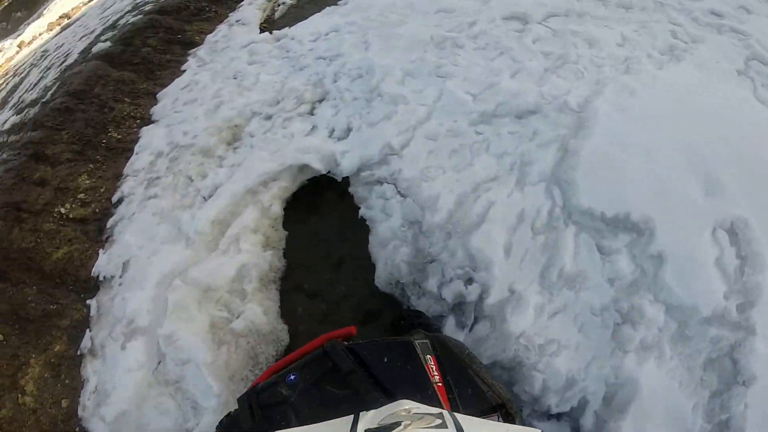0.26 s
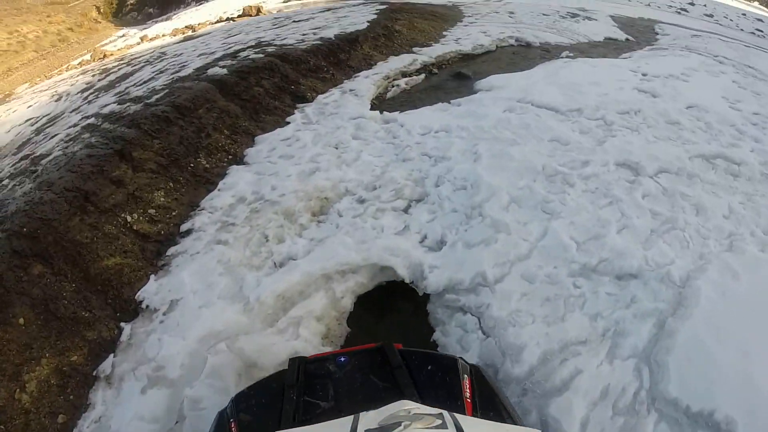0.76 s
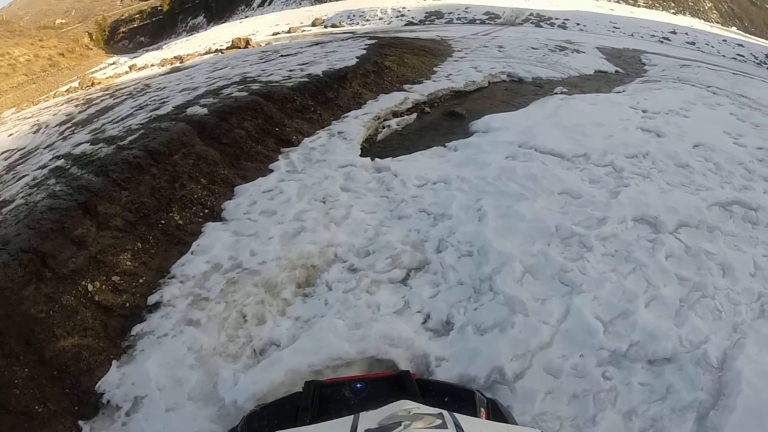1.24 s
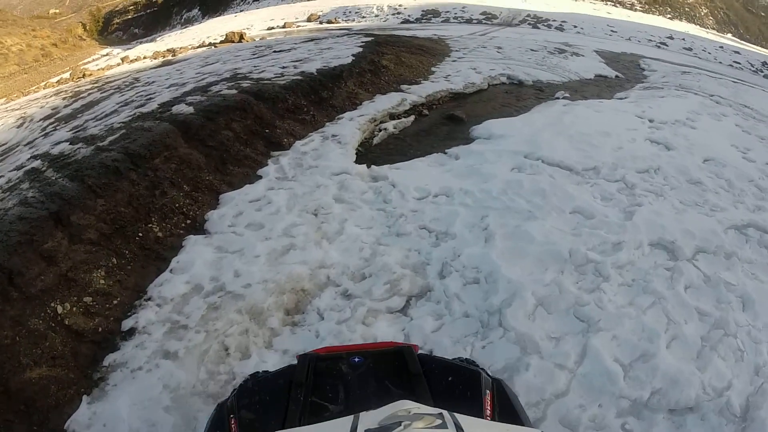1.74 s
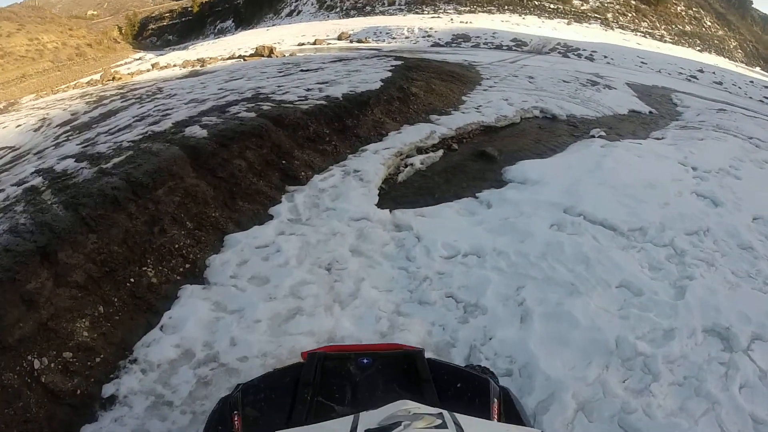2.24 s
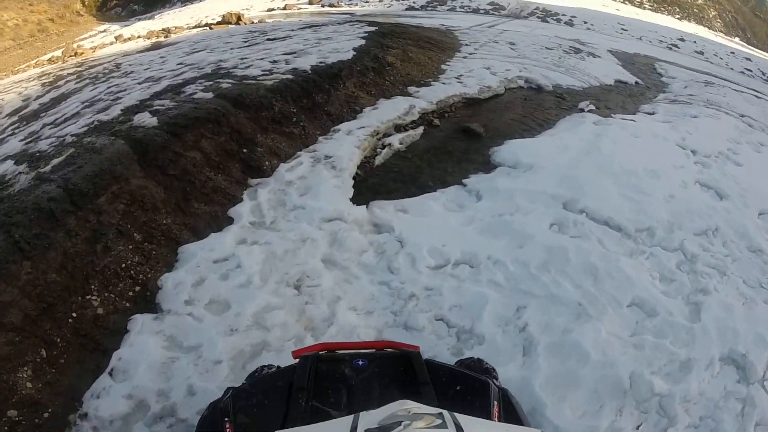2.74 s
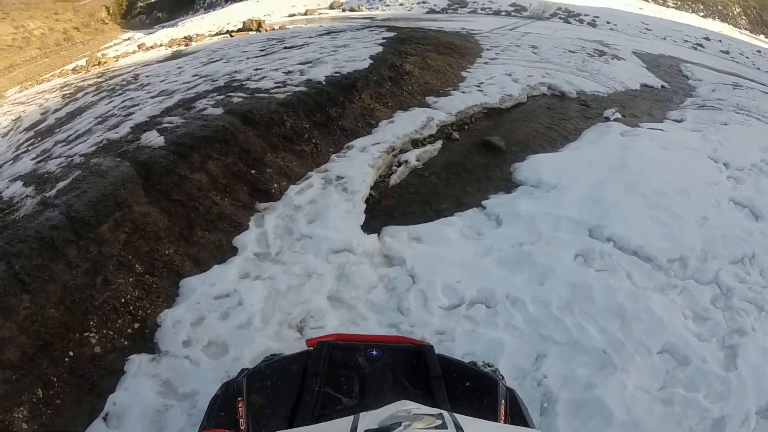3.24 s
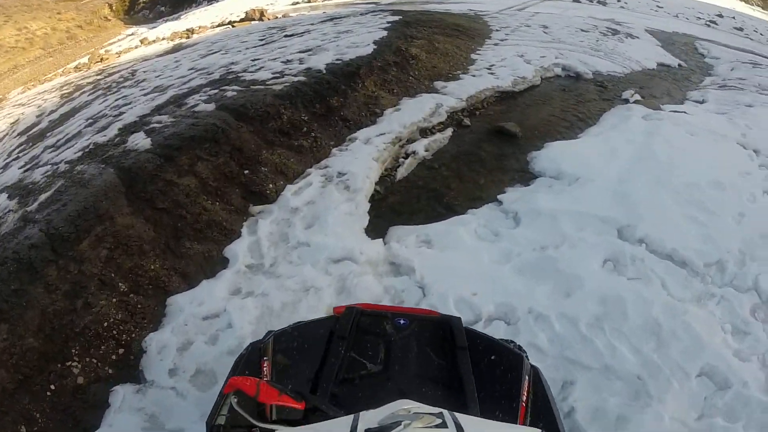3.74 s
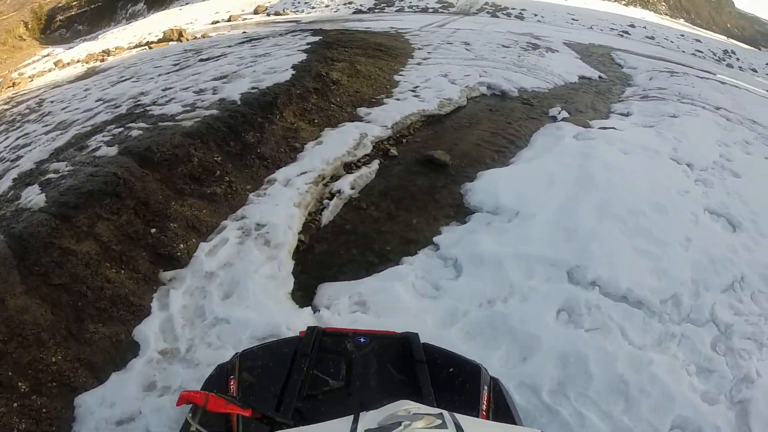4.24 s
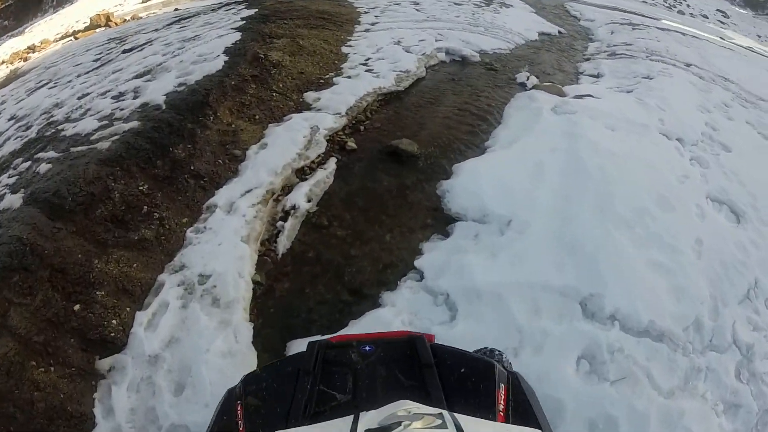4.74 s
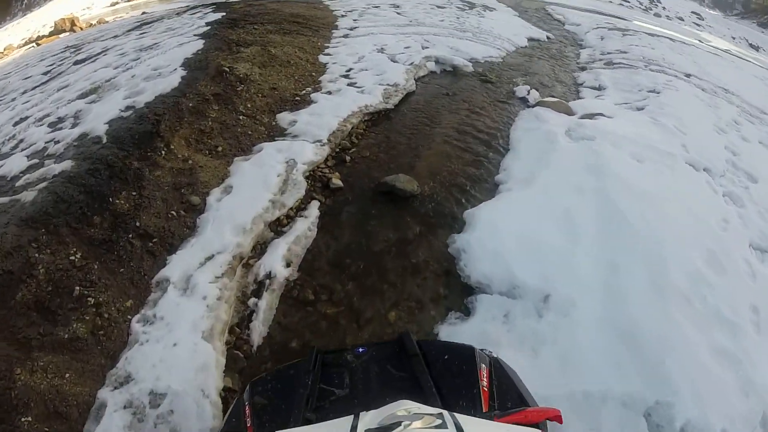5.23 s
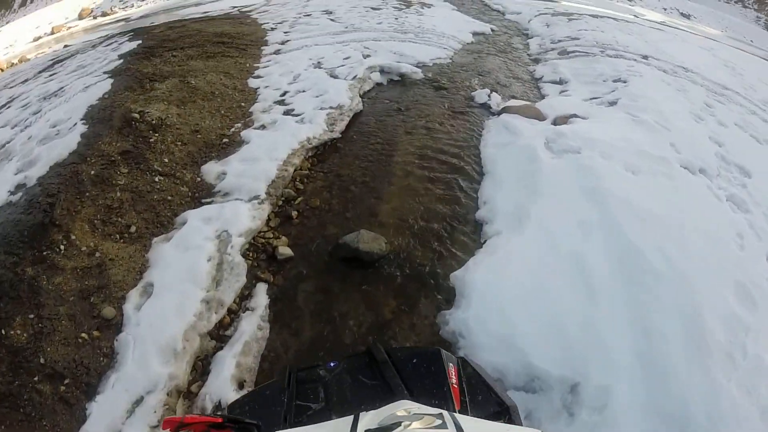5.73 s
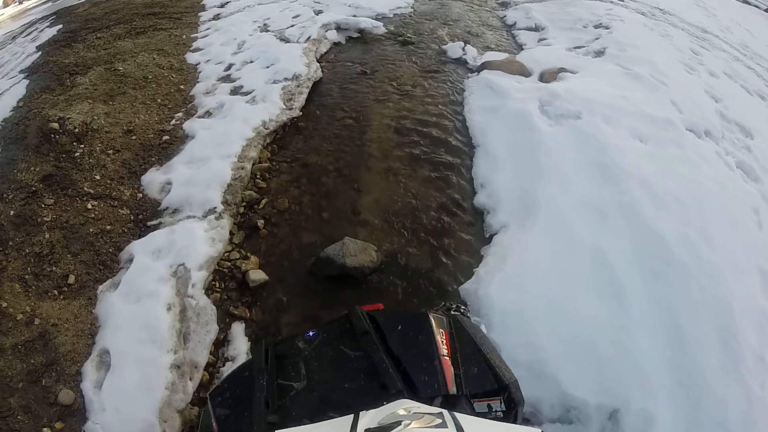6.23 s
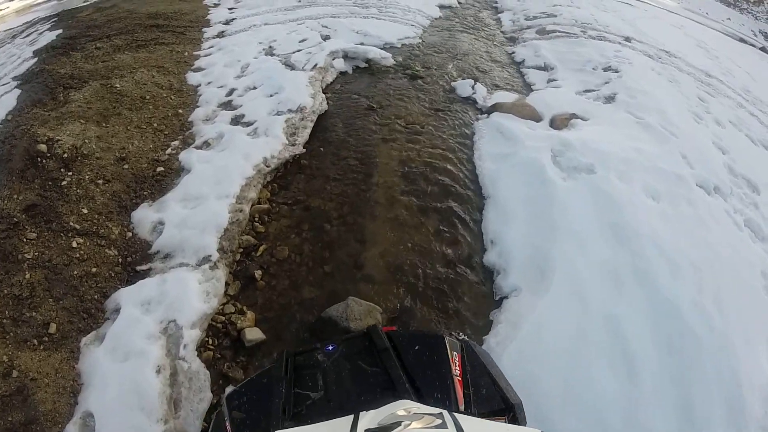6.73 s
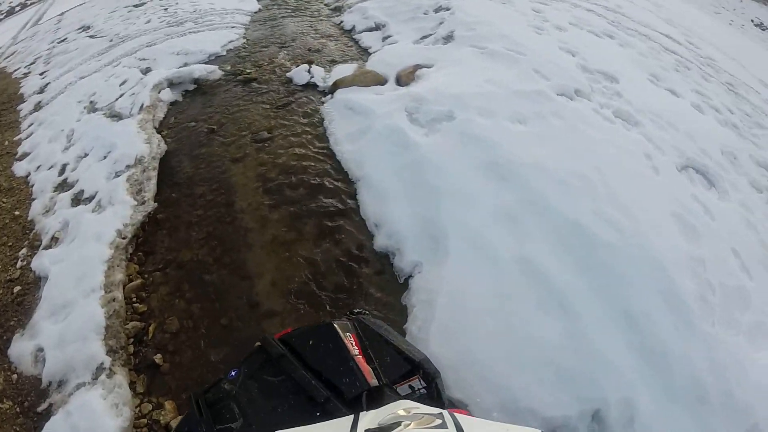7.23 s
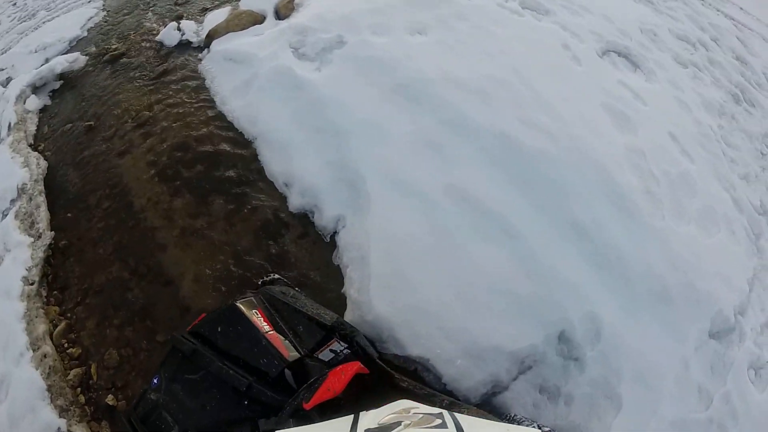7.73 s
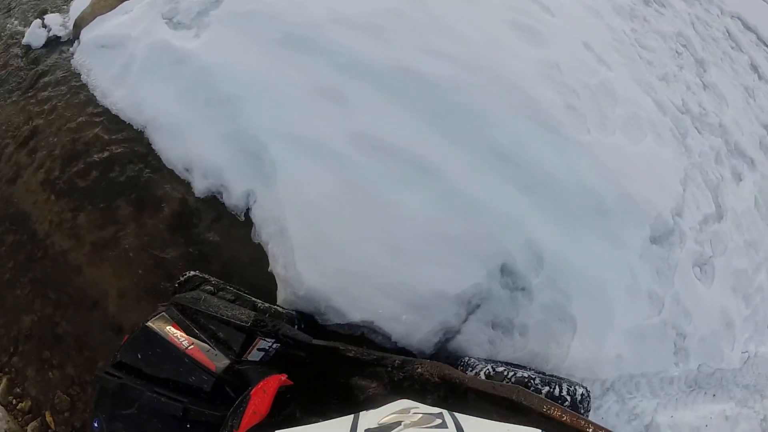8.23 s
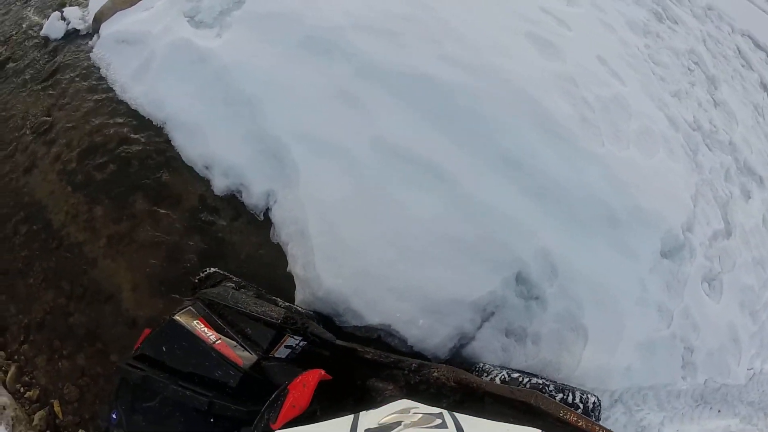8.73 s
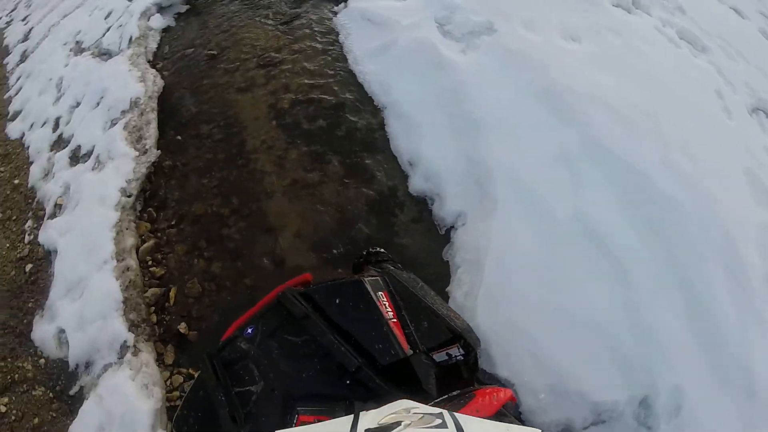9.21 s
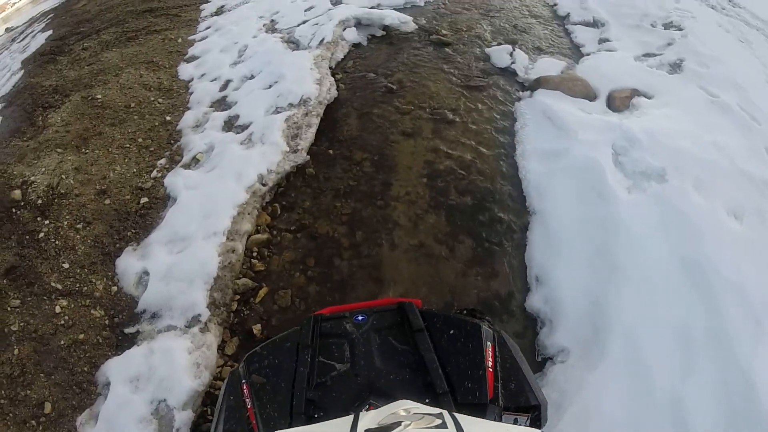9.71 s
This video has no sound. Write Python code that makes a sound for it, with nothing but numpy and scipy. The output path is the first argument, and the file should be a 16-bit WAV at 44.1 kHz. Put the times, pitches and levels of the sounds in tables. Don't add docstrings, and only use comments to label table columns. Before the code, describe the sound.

A quad bike's uneven twin-cylinder engine is heard close below a helmet-mounted microphone in a snowy creek bed, dry and without echo. It begins in a throaty growl at medium revs, lifts near 0.5 s, sags by 1.3 s and surges again at 1.8 s. After easing, it climbs from 2.6 s to its highest pitch near 3.4 s and stays loud, barking and booming until 4.7 s, with a thin metal panel singing around 1.6 kHz. Revs tumble by 5.5 s amid dull stone knocks. From 6 to 8 s it idles slowly, paired thuds over clattering valve gear, missing one beat near 8 s. It pulls away with deep intake gulps, rising to 9.2 s, then eases with loose rattles. Sharp plastic ticks, notably at 1.8, 2.5, 3.6 and 6.5 s, punctuate faint snow crunch and deep microphone shudder.

```python
import sys
import numpy as np
from scipy import signal
from scipy.fft import rfft, irfft
from scipy.io import wavfile
from scipy.ndimage import uniform_filter1d

SR = 44100
rng = np.random.default_rng(int(sys.argv[2]) if len(sys.argv) > 2 else 0)


def wrap_up_sound(samples):
    columns = np.atleast_2d(samples).T
    tamed = np.clip(columns, -1, 1)
    steps = np.round(tamed * 32767).astype(np.int16)
    wavfile.write(sys.argv[1], SR, steps)


def gain_from_db(level_db):
    decades = np.asarray(level_db, float) / 20
    return 10 ** decades


N = 439677
T = np.arange(N) / SR

# time_s, cycle_rate_hz
SPEED = [(0.0, 18.3), (0.36, 18.8), (0.55, 22.2), (1.27, 15.2), (1.77, 27.8), (2.17, 20.8), (2.6, 19.8),
         (2.9, 25.3), (3.38, 31.0), (3.8, 26.3), (4.15, 30.0), (4.62, 29.7), (5.5, 13.6), (6.05, 9.96),
         (8.0, 9.85), (8.62, 12.4), (9.2, 17.7), (9.97, 13.2)]
# centre_s, half_width_s, change_hz
SPEED_CHANGES = [(1.8, .12, -.5), (3.6, .12, -.5), (4.85, .2, -.7), (5.2, .1, -1), (5.4, .08, .5), (5.8, .2, -.6),
                 (6.85, .2, -.09), (7.2, .15, .09), (7.7, .15, -.08), (8.1, .15, .3), (8.45, .18, -.17)]
# time_s, pipe_level_db, throttle_0_to_1
EFFORT = [(0.0, -39, 1), (0.28, -41.5, 0.33), (0.46, -41.5, 0.95), (1.2, -41.5, 0.73), (1.53, -38, 1),
          (1.94, -37, 0.96), (2.25, -41, 0.68), (2.58, -40, 0.95), (2.8, -35, 0.91), (3.44, -35.5, 0.93),
          (3.8, -38, 1), (4.5, -32.5, 0.87), (5.05, -37, 0.48), (5.16, -46, 0.48), (7.95, -48.5, 0.32),
          (8.35, -49, 0.35), (9.19, -42.5, 0.4), (9.97, -45.5, 0.22)]
# centre_s, half_width_s, change_db
STUMBLES = [
    (5.32, 0.053, -1),
    (5.62, 0.11, -0.5),
    (5.85, 0.056, 2),
    (7.975, 0.026, -20),
]
# pitch_hz, width_hz, level_db
INTAKE = [(154, 26, 7.5), (204, 40, 1), (95.5, 26, -6), (135, 8.9, -7.5)]
# pitch_hz, width_hz, level_db
EXHAUST = [(209, 59, 0), (147, 4.9, -28), (221, 15, -48), (90, 310, -12)]
# pitch_hz, width_hz, level_db
BARK = [(255.4, 56, 6), (303, 55, -5), (399.3, 21, -1), (556, 71, -14.5), (723, 61, -17.5)]
# pitch_hz, width_hz, level_db
BOOM = [(42.3, 28.5, 0)]
# pitch_hz, width_hz, level_db
FRAME = [(58, 18, -5), (29, 6.8, -21)]
# pitch_hz, width_hz, level_db
THRUM = [(84.4, 18, 0)]
# centre_s, half_width_s, gulp_peak_db
PULLS = [
    (.5, .3, -44),
    (1.45, 0.23, -39),
    (2.9, 0.33, -45),
    (9.5, 0.31, -42),
]
# centre_s, half_width_s, gulp_peak_db
PULL_AWAY = (8.68, .5, -33.5)
# pitch_hz, width_hz, level_db
CASE = [(1392, 380, -2.5), (1813, 264, -3), (2170, 109, 4.5), (2420, 82, 4), (2860, 306, -5),
        (3373, 140, -7)]
# pitch_hz, width_hz, level_db
CASE_TOP = [(4186, 400, 1), (4520, 640, -4), (5700, 130, -13)]
# pitch_hz, width_hz, level_db
GRUMBLE = [(430, 800, -0.5), (908, 237, -1.5), (1086, 207, -5)]
# centre_s, half_width_s, change_db
BELT = [
    (.25, 0.33, -2.5),
    (.72, 0.18, 5.5),
    (2.4, 0.38, -6),
    (6.9, 0.11, -4.5),
    (8.9, 1, 4),
    (9.8, 0.23, -1),
]
# centre_s, half_width_s, order, peak_db
SONG = [(0.22, 0.32, 13, -45), (0.23, 0.74, 12, -66), (0.42, 0.091, 12, -40.5), (0.7, 0.24, 12, -45),
        (0.97, 0.18, 13, -46.5), (1.53, 0.17, 8, -41), (1.75, 0.22, 12, -48), (1.63, 0.31, 17, -46),
        (2.27, 0.5, 5, -39.5), (2.3, 0.41, 13, -49.5), (2.39, 0.38, 12, -43), (2.45, 0.51, 21, -55),
        (3.2, 0.43, 12, -52), (3.15, 0.42, 18, -52), (3.1, 0.22, 16, -54), (3.44, 0.62, 3, -51),
        (3.6, .25, 9, -44), (3.65, 0.24, 15, -61), (4.4, 0.21, 11, -40.5), (4.4, 0.3, 19, -50.5),
        (4.4, 0.36, 12, -50), (4.4, 0.18, 21, -53), (5.0, 0.11, 8, -44), (5.3, 0.067, 11, -54),
        (7.1, 0.69, 14, -58), (7.8, 0.98, 13, -65), (8.55, 0.47, 11, -49.5), (10, 0.22, 3, -40),
        (8.69, 0.65, 3, -40), (9.6, .3, 3, -54), (9.15, 0.54, 18, -51), (9.2, 0.71, 19, -55.5),
        (9.6, 0.27, 15, -50.5), (6.6, 0.74, 3, -56.5), (9.3, 0.73, 5, -53), (1.37, 0.065, 13, -38),
        (1.37, 0.16, 22, -52), (.2, 0.5, 18, -53), (3.23, 0.21, 6, -42), (3.52, 0.23, 7, -46.5),
        (7.0, 0.64, 16, -54.5), (6.15, 0.21, 35, -56), (2.13, 0.16, 8, -42), (1.73, 0.1, 9, -38),
        (3.0, 0.077, 9, -52), (3.8, 0.13, 8, -39), (4.0, 0.1, 9, -43), (2.37, 0.24, 6, -47),
        (5.25, .12, 12, -54), (8.95, 0.25, 9, -47.5)]
# pitch_hz, width_hz, level_db
PANEL_MODES = [
    [(1580, 9.1, -8.5), (1534, 20, -8.5)],
    [(1568, 8.5, 1.5), (1606, 45, -9)],
]
# start_s, hold_s, level_db
SINGING = [(0.61, 0.35, -41.5), (1.417, 0.031, -46), (1.615, 0.054, -32.5), (1.913, 0.13, -37),
           (2.24, 0.25, -48), (2.963, 0.41, -38), (3.49, 0.017, -36), (3.644, 0.22, -40),
           (4.032, 0.15, -33.5), (4.317, 0.18, -30.5), (4.59, 0.12, -31), (4.87, 0.13, -46.5),
           (5.084, 0.027, -40)]
# time_s, upper_share_0_to_1
PANEL_TONE = [(0, 0.4), (1.75, 0), (1.95, 0.3), (2.2, 0.6), (3.05, 0.04), (3.3, 0.94), (3.95, 0.4),
              (4.4, 0.9), (5.3, 0.3)]
# start_s, peak_db, pitch_hz, treble_minus_peak_db, knock_minus_peak_db
TICKS = [(1.8298, -21.5, 2180, -15, -23), (1.915, -26, 2170, -30, -24), (2.447, -38, 2340, -21, -2),
         (2.5175, -20.5, 2300, -7, -13), (3.558, -23, 2200, -8.5, -19), (5.6371, -39.5, 2270, -17, 2),
         (5.9087, -53, 2130, -2, 2), (6.2175, -41.5, 2280, 11.5, -20), (6.5164, -22, 2140, -13.5, -19),
         (6.9085, -59, 2520, -3, -13), (7.3416, -40, 2170, -3, -14), (7.645, -31, 2130, -25, -15),
         (7.9074, -25, 2170, -19, -18), (9.2199, -48, 2420, 9, -12), (9.3126, -25, 2170, -9.5, -18),
         (9.612, -37, 1800, -13, -13), (9.903, -32, 2180, -23, -8)]
# start_s, length_s, level_db, treble_minus_level_db
CHATTER = [(0.334, .004, -50, 3), (0.48, 0.0038, -45, 0.5), (.512, .012, -47, -3), (0.548, 0.0052, -49, 2),
           (6.219, .012, -45, -3.5), (6.244, .004, -48, -3), (6.39, .004, -52, -2), (9.612, .006, -44, -10),
           (9.797, 0.0077, -41.5, -8.5), (9.8164, .003, -56, 2), (9.845, .004, -48, -11),
           (9.887, .009, -44.5, -7.5), (9.909, .016, -48, -10)]
# start_s, peak_db, pitch_hz
STONES = [(5.267, -43, 374), (5.325, -33.5, 306), (5.3, -43, 544), (5.438, -40, 460), (5.531, -40, 485),
          (5.636, -34.5, 640), (5.638, -37, 296), (6.179, -41, 352), (6.522, -42, 770), (9.7, -37.5, 302),
          (9.891, -38.5, 540), (9.917, -46, 550)]
# time_s, level_db
ROLLING = [(0.0, -50.5), (0.24, -58.5), (0.52, -49.5), (1.15, -54.5), (1.45, -51), (1.9, -50),
           (2.22, -56.5), (3.2, -54.5), (4.55, -54.5), (5.1, -60), (5.7, -58), (5.86, -65), (8.14, -65.5),
           (8.86, -57), (9.5, -63), (9.97, -65)]
# start_s, level_db
BREAKS = [(0.33, -78), (1.01, -58), (1.379, -52.5), (2.515, -58), (3.54, -77), (5.89, -59), (6.22, -53),
          (6.25, -64), (7.33, -62), (9.35, -58), (9.61, -61), (9.81, -72), (9.9, -65), (9.92, -85)]
# pitch_hz, density_db
CRUNCH = [(2820, -10.5), (4800, -2), (5750, -5), (7090, -11), (8570, -21), (10400, -20), (12100, -26),
          (14600, -26.5), (15400, -34)]
# start_s, level_db
BUMPS = [(0.1, -46), (0.522, -37), (0.897, -56), (1.9, -32), (2.27, -30), (2.6, -33), (2.919, -59),
         (3.451, -23), (3.82, -22), (4.25, -37), (4.7, -36), (5.45, -28.5), (5.928, -30.5), (6.268, -33.5),
         (6.65, -51), (7.122, -44), (9.34, -32.5), (9.642, -40)]

IDLE_HZ = 9.37
SECOND_FIRING, SECOND_DB = 0.38, 1.5
BREAK_ATTACK_S, BREAK_RELEASE_S = 0.003, 0.03


def level(x, db=0):
    return x * gain_from_db(db) / np.sqrt(np.mean(x ** 2))


def curves(table):
    s, *columns = np.transpose(table)
    return [np.interp(T, s, column) for column in columns]


def humps(table):
    return sum(change * np.exp(-((T - s) / width_s) ** 2) for s, width_s, change in table)


def labouring(s, width_s, db):
    return gain_from_db(db) * np.exp(-((T - s) / width_s) ** 4)


def swell(s, db, attack_s, hold_s, release_s):
    rise = np.clip(1 + (T - s) / attack_s, 0, 1) ** 2
    return gain_from_db(db) * rise * np.exp(-np.maximum(T - s - hold_s, 0) / release_s)


def crust(change_db=0):
    return sum(swell(s, db + change_db, BREAK_ATTACK_S, 0, BREAK_RELEASE_S) for s, db in BREAKS)


def ring(x, modes):
    out = 0
    for k, (hz, width, db) in enumerate(modes):
        out = out + (-1) ** k * gain_from_db(db) * signal.lfilter(*signal.iirpeak(hz, hz / width, SR), x)
    return out


def muffled(x, hz):
    return signal.sosfilt(signal.butter(4, hz, fs=SR, output="sos"), x)


def steady(x, span_s):
    k = int(span_s * SR)
    return x / np.sqrt(uniform_filter1d(uniform_filter1d(x ** 2, k), k) + 1e-18)


def walk(rate):
    k = int(SR / rate)
    held = np.repeat(rng.standard_normal(N // k + 1), k)
    return 0.82 * uniform_filter1d(uniform_filter1d(held, k), k)[:N]


def decay(x, s):
    return signal.lfilter([1], [1, -np.exp(-1 / (s * SR))], x)


def strokes(cycle, places, jitter_s, scatter_db=1.0):
    out = np.zeros(N)
    whole = np.arange(-1, int(cycle[-1]) + 1)
    for share, db in places:
        chance = rng.standard_normal((len(whole), 2))
        at = np.interp(whole + share, cycle, T, left=-1, right=99) + jitter_s * chance[:, 0]
        inside = (at > 0) & (at < T[-1])
        np.add.at(out, (at[inside] * SR).astype(int), gain_from_db(db + scatter_db * chance[inside, 1]))
    return out


def grains(per_s, spread_db):
    chance = rng.random((3, N))
    size = gain_from_db(-spread_db * np.log(1 - chance[2]))
    return (chance[0] < per_s / SR) * np.sign(chance[1] - 0.5) * size


def engine():
    flywheel_s, idle_firing_s = 0.12, 6.472
    hz = uniform_filter1d(curves(SPEED)[0], int(flywheel_s * SR)) + humps(SPEED_CHANGES)
    turns = np.cumsum(hz) / SR
    octaves = np.log2(hz / IDLE_HZ)
    cycle = turns + (-turns[int(idle_firing_s * SR)]) % 1
    pipe_db, throttle = curves(EFFORT)
    pipe_db = pipe_db + humps(STUMBLES)
    breath = breathing(cycle, octaves, pipe_db, throttle)
    return breath + clatter(cycle, octaves, throttle) + song(cycle, breath)


def breathing(cycle, octaves, pipe_db, throttle):
    bark_db = -34.5 + 44 * throttle - 5.5 * octaves
    boom_db = -43 + 16 * throttle - 3 * octaves ** 2 - pipe_db
    thrum_db = -55.5 + 14 * throttle - 3 * octaves
    tuned_hz = 26.5
    exhaust_db = -1 - 10 * throttle + 18 / (1 + (tuned_hz / IDLE_HZ / 2 ** octaves) ** 14)

    snaps = strokes(cycle, [(0, 0), (SECOND_FIRING, SECOND_DB)], 0.00015)
    lag = 0.1977 + 0.0067 * octaves
    beats = strokes(cycle - lag, [(0, -1.5), (SECOND_FIRING + 0.019, 1.2)], 0.0004) * gain_from_db(exhaust_db)
    gas = steady(decay(snaps, 0.0076), 0.34) * rng.standard_normal(N)
    air = rng.standard_normal(N)

    clean = level(ring(snaps, INTAKE)) + level(ring(beats, EXHAUST), 1.0)
    clean = muffled(muffled(clean, 407), 206.5)
    pipe = steady(clean, 0.25) + level(muffled(ring(air, EXHAUST), 250), -17)

    bark = steady(muffled(ring(snaps + 0.08 * beats, BARK), 800), 0.25)
    bark = bark + level(muffled(ring(gas, BARK), 900), -18)
    bark = bark + level(muffled(ring(air, BARK), 900), -22)

    lead_s = 0.004
    early = np.roll(snaps, -int(lead_s * SR))
    boom = steady(muffled(ring(early + 0.1 * beats, BOOM), 62), 0.3)
    boom = boom + level(muffled(ring(air, FRAME), 65), -15)

    thrum = level(ring(ring(snaps + 0.14 * beats, THRUM), THRUM)) * gain_from_db(thrum_db)
    mix = level(pipe) + level(bark) * gain_from_db(bark_db - 6.0) + level(boom) * gain_from_db(boom_db - 6.0)
    return gain_from_db(pipe_db) * mix + thrum + gulp(snaps)


def gulp(snaps):
    lag_s, draw_s, ring_s = 0.0035, 0.004, 0.013
    pitch_hz, rebound, swing = 275, 0.7, 0.75
    t = np.arange(-1500, 1501) / SR - lag_s
    draw = -np.exp(np.minimum(t, 0) / draw_s)
    ringing = 1 - swing + swing * np.cos(2 * np.pi * pitch_hz * t)
    shut = rebound * np.exp(-np.abs(t) / ring_s) * ringing
    shape = np.where(t < 0, draw, shut)
    gain = labouring(*PULL_AWAY) + sum(labouring(*pull) for pull in PULLS)
    return muffled(signal.fftconvolve(snaps * gain, shape, "same"), 720)


def clatter(cycle, octaves, throttle):
    level_db = -55.5 + 6 * octaves + 3 * throttle
    top_db = -3.5 - 2.5 * octaves + humps(BELT)
    grumble_db = 1.5 + 1.5 * (throttle - 0.6) - 0.9 * octaves
    places = [(0.03, 0), (0.25, -10), (0.41, 0), (0.65, -9), (0.85, -12)]
    valves = steady(decay(strokes(cycle, places, 0.0008, 2.5), 0.008), 0.25)
    shut, opened = 0.12, 1.7
    depth = shut + (opened - shut) * throttle ** 2 / 2 ** octaves
    depth = depth + 0.6 * labouring(*PULL_AWAY[:2], 0)
    rattle = rng.standard_normal(N) * (1 + depth * valves) * gain_from_db(1.1 * walk(14))
    rattle = rattle + level(grains(400, 1.1), -12)
    body = level(muffled(ring(rattle, CASE), 7900))
    top = level(muffled(ring(rattle, CASE_TOP), 7300)) * gain_from_db(top_db - 1.5)
    grumble = level(muffled(ring(rattle, GRUMBLE), 2115)) * gain_from_db(grumble_db - 3.0)
    return (gain_from_db(level_db + 0.42) + crust()) * (body + top + grumble)


def song(cycle, breath):
    out = np.zeros(N)
    flutter = gain_from_db(0.67 * walk(9))
    for s, width_s, order, db in SONG:
        near = slice(max(int((s - 2 * width_s) * SR), 0), int((s + 2 * width_s) * SR))
        partial = np.exp(-((T[near] - s) / width_s) ** 2 + 2j * np.pi * order * cycle[near])
        found = np.vdot(partial, breath[near])
        out[near] += gain_from_db(db) * np.real(partial * found / np.abs(found))
    return out * flutter


def panel():
    rest_db, stops_s, attack_s, release_s = -53, 5.25, 0.1, 0.1
    gain = gain_from_db(rest_db) * (T < stops_s)
    gain = gain + sum(swell(s, db, attack_s, hold_s, release_s) for s, hold_s, db in SINGING)
    shaking = rng.standard_normal(N) * gain_from_db(0.5 * walk(23.0))
    sheet = ring(shaking, [(1563, 200, 0)])
    lower_tone, upper_tone = (level(ring(sheet, modes)) for modes in PANEL_MODES)
    upper = np.clip(curves(PANEL_TONE)[0], 0, 1)
    return steady((1 - upper) * lower_tone + upper * upper_tone, 0.087) * gain_from_db(-7.0) * gain


def ticks():
    out, t = np.zeros(N + 2000), np.arange(2000) / SR
    for s, peak_db, hz, treble_db, knock_db in TICKS:
        envelope = np.minimum(t / 0.0009, 1) * np.exp(-t / 0.0019)
        body = envelope * (np.sin(2 * np.pi * hz * t) + 0.19 * np.sin(2 * np.pi * 1.484 * hz * t))
        hiss = ring(rng.standard_normal(len(t)), [(5620, 740, 23.9), (3360, 1700, 17.0)])
        edge = np.exp(-t / 0.0017) * hiss
        knock = np.exp(-t / 0.0013) * (np.sin(2 * np.pi * 800 * t) + 0.29 * np.sin(2 * np.pi * 480 * t))
        tick = 1.3 * body + gain_from_db(treble_db - 14.0) * edge + gain_from_db(knock_db + 4.0) * knock
        tick = tick + 0.65 * np.roll(tick, int(0.0026 * SR))
        start = int(s * SR)
        out[start:start + len(t)] += gain_from_db(peak_db) * tick
    return out[:N]


def chatter():
    attack_s, release_s = 0.00081, 0.0041
    knocks = rng.standard_normal(N) + level(grains(1500, 3.1), -1.6)
    body = level(ring(knocks, CASE))
    top = level(ring(knocks, CASE_TOP + [(6500, 1750, -8.5)]))
    out = np.zeros(N)
    for s, length_s, db, treble_db in CHATTER:
        out += swell(s, db, attack_s, length_s, release_s) * (body + gain_from_db(treble_db) * top)
    return out


def stones():
    out, t = np.zeros(N + 4000), np.arange(4000) / SR
    for s, peak_db, hz in STONES:
        tones = np.sin(2 * np.pi * hz * t)
        tones = tones + 0.69 * np.sin(2 * np.pi * 0.77 * hz * t)
        tones = tones + 0.42 * np.sin(2 * np.pi * 1.36 * hz * t)
        start = int(s * SR)
        out[start:start + len(t)] += gain_from_db(peak_db - 4.5) * np.exp(-t / 0.012) * tones
    return out[:N]


def ground():
    rolling = gain_from_db(curves(ROLLING)[0]) + crust()
    calm_db, attack_s, hold_s, release_s = -38.5, 0.087, 0.051, 0.082
    bumps = gain_from_db(calm_db) + sum(swell(s, db, attack_s, hold_s, release_s) for s, db in BUMPS)
    hz, db = np.transpose(CRUNCH)
    colour = gain_from_db(np.interp(np.log(np.fft.rfftfreq(N, 1 / SR) + 1), np.log(hz), db))
    cracks = steady(decay(np.abs(grains(40, 1.8)), 0.006), 2.3)
    hiss = rng.standard_normal(N) * (1 + 0.18 * cracks) * gain_from_db(1.2 * walk(12))
    hiss = hiss + level(grains(900, 1.8), -10)
    crunch = level(irfft(rfft(hiss) * colour, N)) * gain_from_db(3.0) * rolling
    shaking = muffled(ring(rng.standard_normal(N), [(11, 18, 0)]), 26)
    shudder = steady(shaking, 0.3) * bumps * gain_from_db(-4)
    return crunch + shudder


def scene():
    return (engine() + panel() + ground() + ticks() + stones() + chatter())[None]


def roll_off(x):
    return signal.sosfilt(signal.butter(12, 15540, fs=SR, output="sos"), x)


def record(dry):
    return roll_off(dry)


dry = scene()
out = record(dry)
wrap_up_sound(out)
```